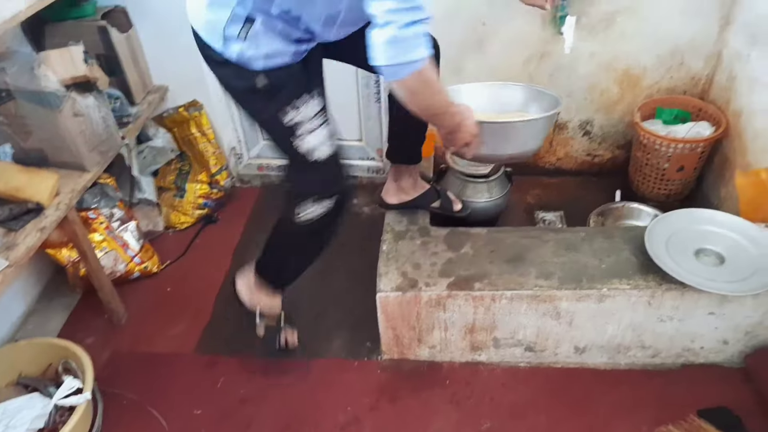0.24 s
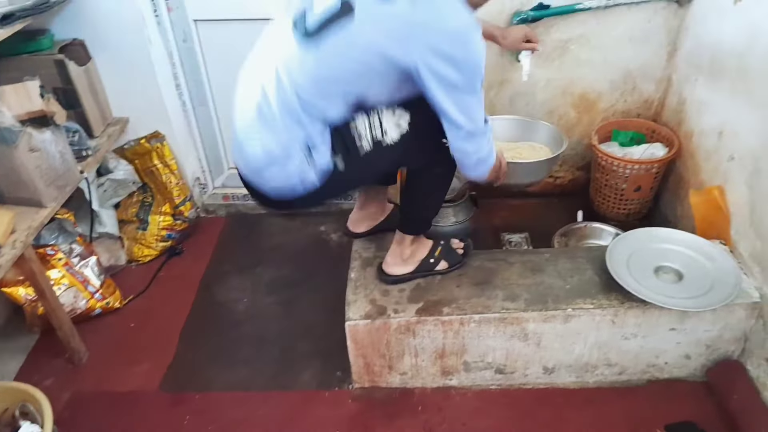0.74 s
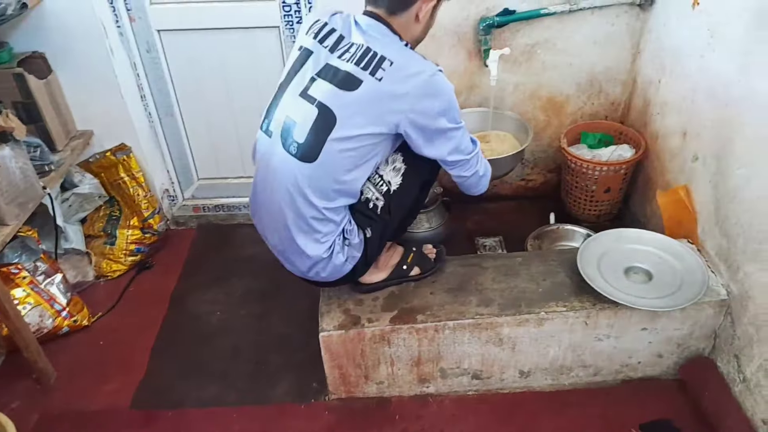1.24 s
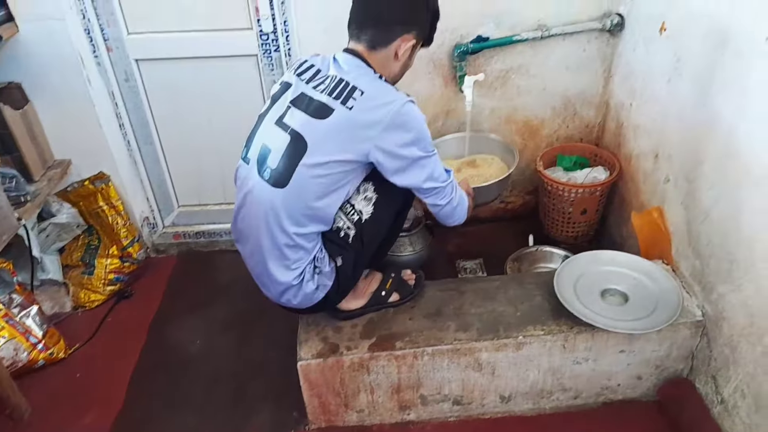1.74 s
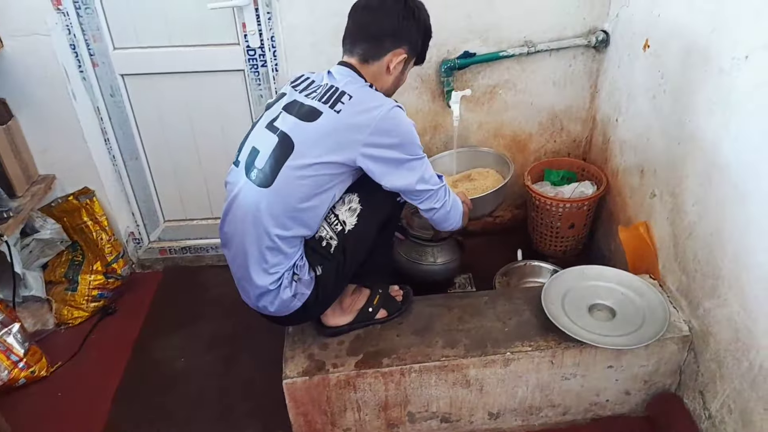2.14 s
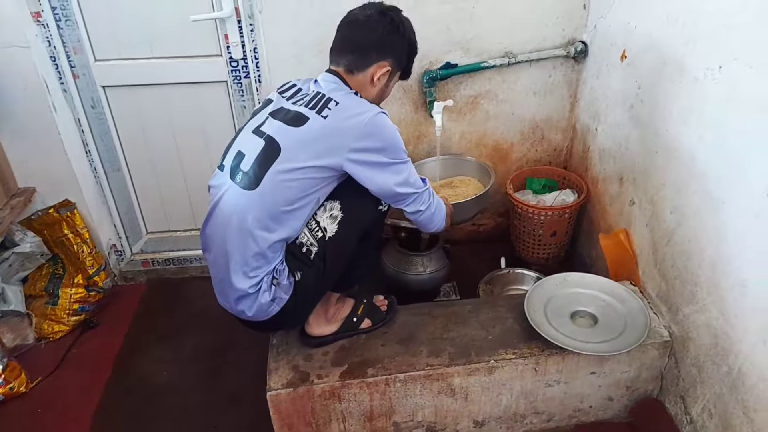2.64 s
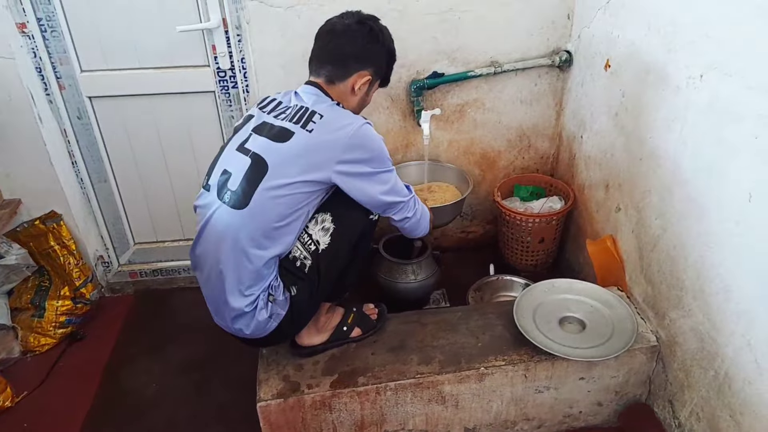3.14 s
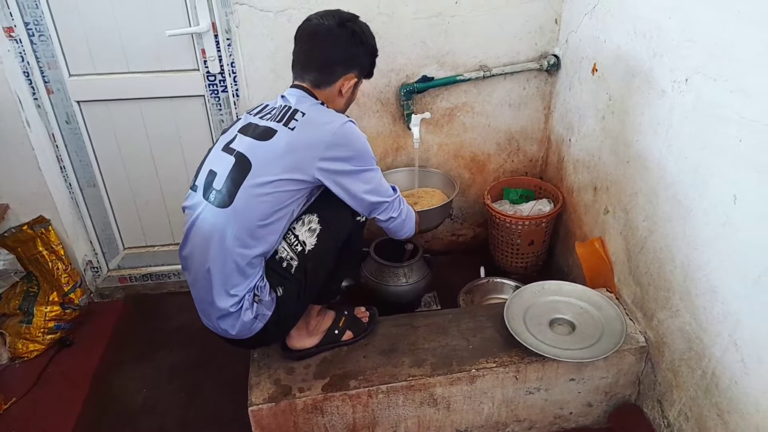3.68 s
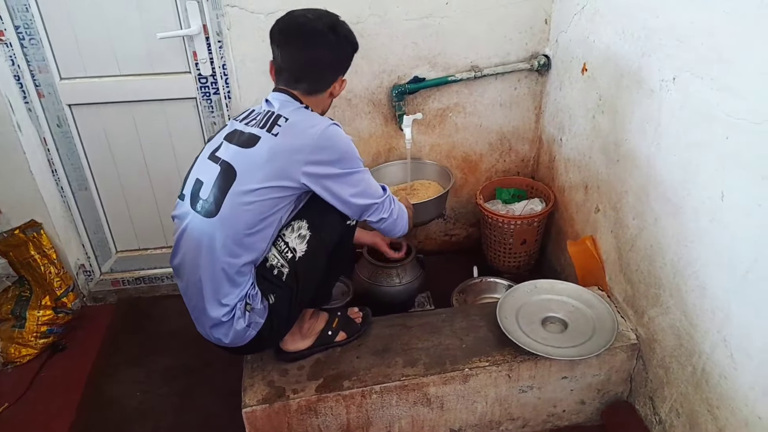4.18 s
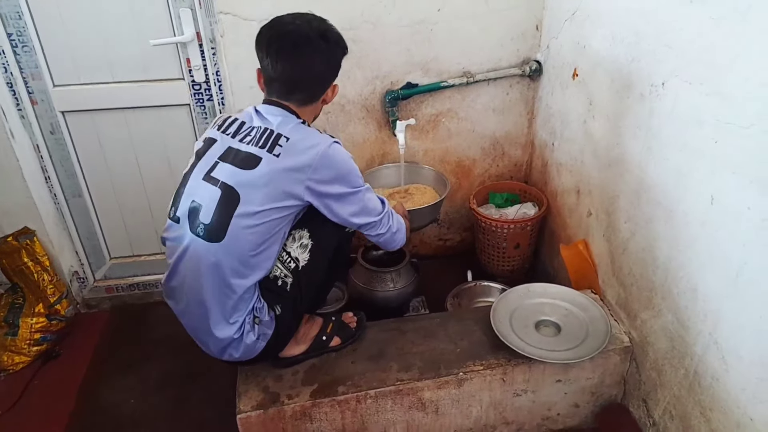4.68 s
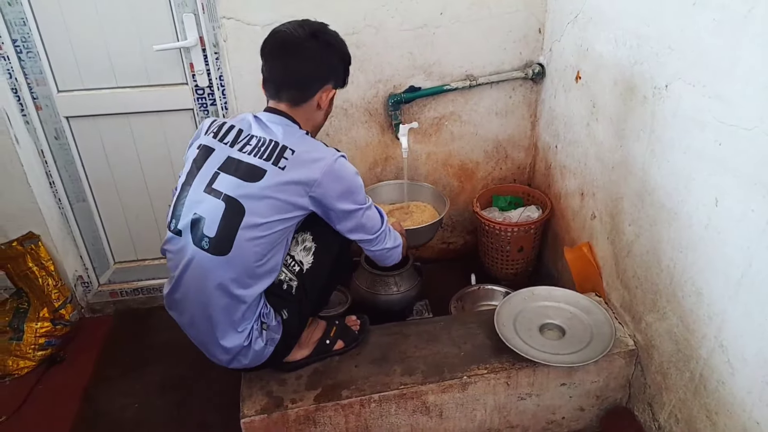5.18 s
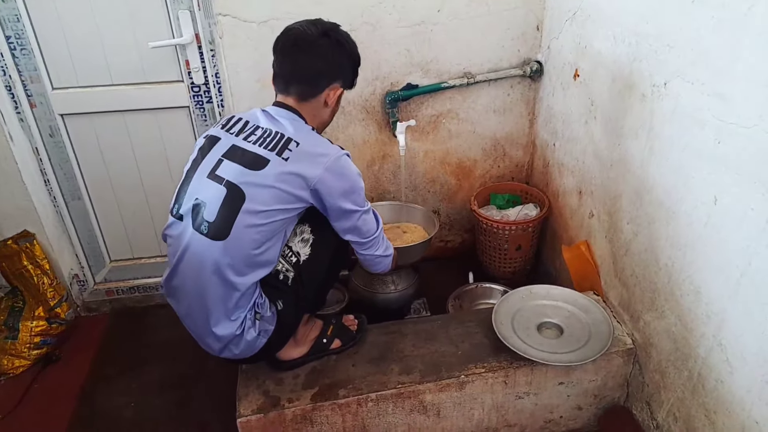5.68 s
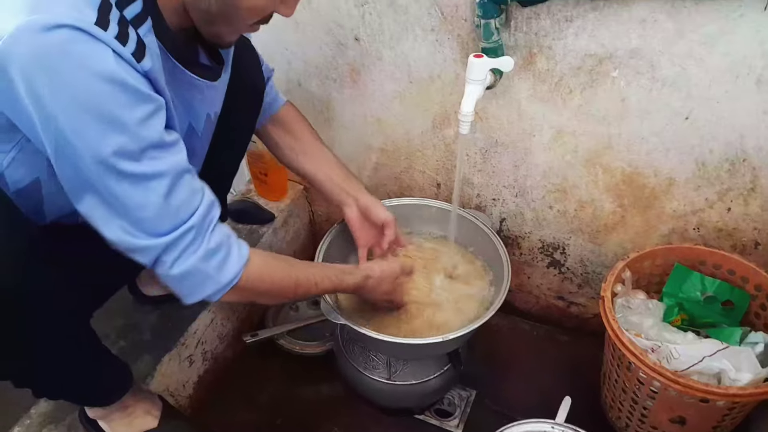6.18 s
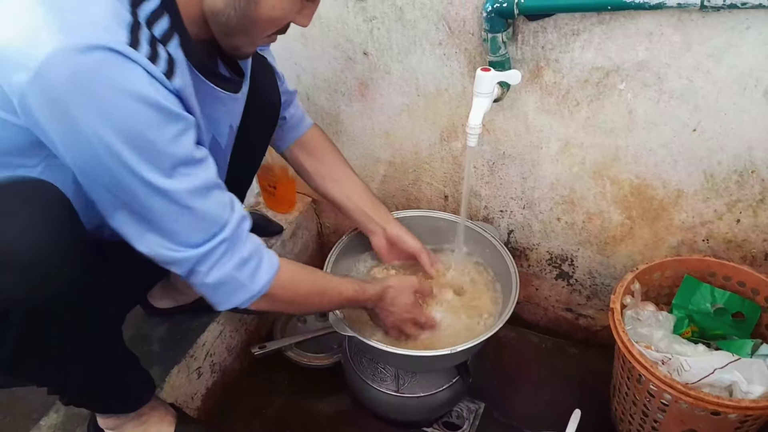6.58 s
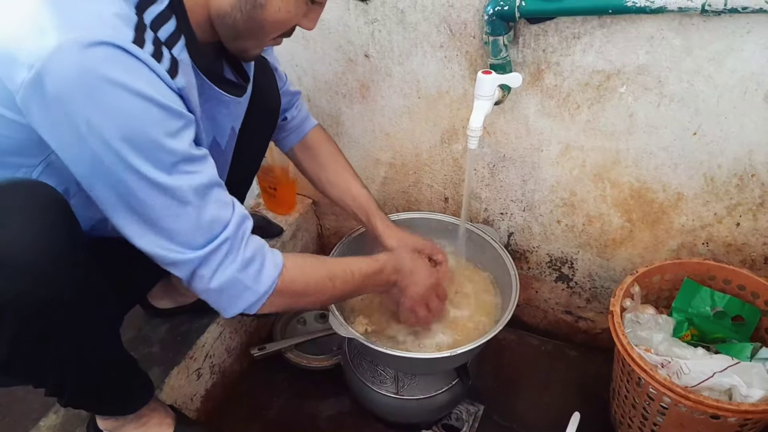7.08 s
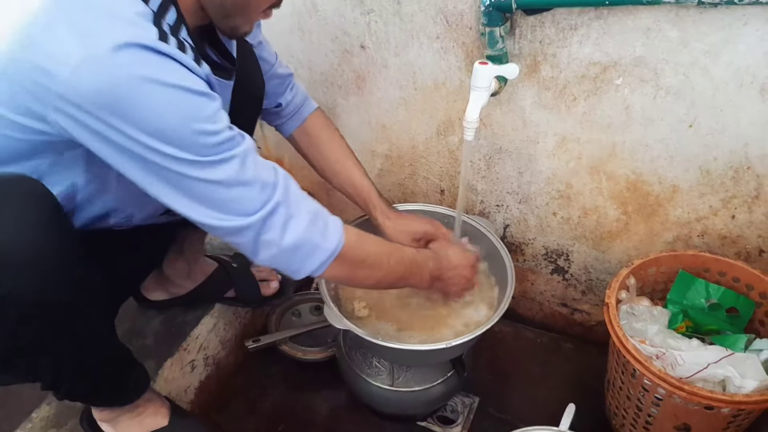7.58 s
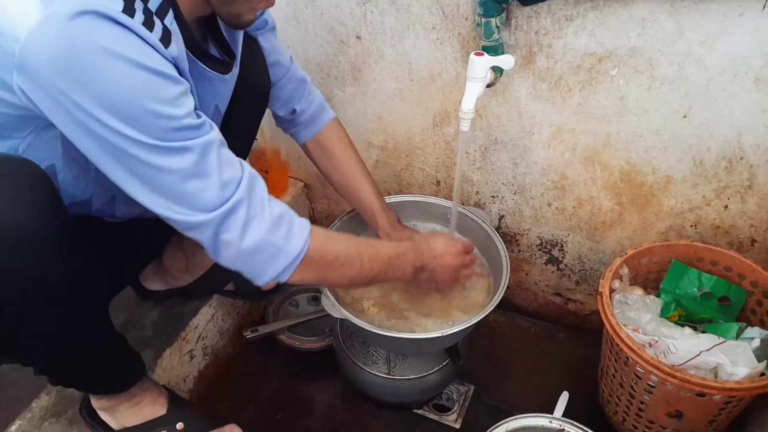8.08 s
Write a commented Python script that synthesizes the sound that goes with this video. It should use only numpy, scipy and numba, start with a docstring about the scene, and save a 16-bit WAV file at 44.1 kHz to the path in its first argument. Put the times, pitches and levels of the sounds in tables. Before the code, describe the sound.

A tap squeaks open and water patters into a metal basin of rice, a pot drags and clanks, then hands swish the wet grains.

```python
"""In a quiet room clothes rustle, a sandal scuffs and a heavy footfall booms; then a tap spits and whistles open.
Thin spray thickens into a jet on a metal basin of rice: swarms of tiny damped sines, the bubbles rising in pitch.
A pot is tugged over concrete (judder and groan), then knocks on the basin: two sets of ringing modes and clatter.
Last, hands swish the wet rice stroke by stroke: rubbing, sloshing and drumming grains, with single splashes.
Noise-burst echoes of hard walls close by surround most sources; most of the spectrum leans to the right."""
import sys
import numpy as np
from scipy import signal
from scipy.fft import rfft, irfft, next_fast_len
from scipy.io import wavfile
from scipy.ndimage import uniform_filter1d
from numba import njit

SR = 44100
rng = np.random.default_rng(int(sys.argv[2]) if len(sys.argv) > 2 else 0)


def digitize_waveform(pressure):
    """Quantize a signal to 16-bit integers and store it at the path in sys.argv[1].

    Rows of a 2-D input are taken as channels; values are limited to [-1, 1].
    """
    field = np.atleast_2d(pressure).T
    bounded = np.clip(field, -1, 1)
    quanta = np.round(bounded * 32767).astype(np.int16)
    wavfile.write(sys.argv[1], SR, quanta)


N = 367353
TIME = np.arange(N) / SR


def undb(db):
    """Decibels to gain."""
    return 10 ** (np.asarray(db) / 20)


def unit(x):
    """Scale to rms 1."""
    return x / np.sqrt(np.mean(x ** 2) + 1e-20)


def curve(rows, index=1):
    """One column of a table, joined by straight lines in time."""
    rows = np.array(rows)
    return np.interp(TIME, rows[:, 0], rows[:, index])


def swell(rows, index=1):
    """Gain from a dB column, faded to silence outside the table's times."""
    inside = (TIME >= rows[0][0]) & (TIME <= rows[-1][0] + .02)
    return undb(curve(rows, index)) * uniform_filter1d(inside * 1., size=500)


def gesture(s, length_s, attack_s, release_s):
    """Envelope of one movement: it builds, holds, and dies away."""
    build = np.clip((TIME - s) / attack_s, 0, 1)
    return build * np.exp(-np.clip((TIME - s - length_s) / release_s, 0, 20))


def gestures(rows, attack_s, release_s, index=2):
    """Gain of a run of movements (start, length, dB columns); the loudest one rules at each moment."""
    moves = [undb(row[index]) * gesture(row[0], row[1], attack_s, release_s) for row in rows]
    return np.max(moves, axis=0)


def colour(x, points):
    """Filter by a spectrum of (f/Hz, level/dB) points, falling steeply beyond its ends."""
    hz, db = np.transpose(points)
    size = next_fast_len(N, True)
    f = np.fft.rfftfreq(size, 1 / SR) + 1
    skirts = 1 / np.sqrt((1 + (hz[0] / f) ** 8) * (1 + (f / hz[-1]) ** 8))
    shape = skirts * undb(np.interp(np.log(f), np.log(hz), db))
    return irfft(rfft(x, size) * shape, size)[..., :N]


def band(x, lo_hz, hi_hz):
    """Causal band-pass."""
    edges = [lo_hz, min(hi_hz, SR / 2 - 100)]
    return signal.sosfilt(signal.butter(3, edges, "band", fs=SR, output="sos"), x)


def add(out, s, sound):
    """Mix a sound in at time s."""
    start = int(s * SR)
    out[:, start:start + sound.shape[-1]] += sound[..., :N - start]


def diffuse(size, alike_hz=550):
    """Noise from all sides: the two channels agree in the bass only."""
    mid, side = rng.standard_normal((2, size))
    side = signal.sosfilt(signal.butter(1, alike_hz, "high", fs=SR, output="sos"), side)
    return np.array([mid + side, mid - side]) / np.sqrt(2)


def room(x, wet_db, early_db=3, early_s=0.0069):
    """Direct sound, a cluster of echoes from the corner, and a short tail."""
    tail_t60_s = .36
    t = TIME[:SR // 2]
    early = diffuse(len(t)) * np.exp(-t / early_s)
    tail = diffuse(len(t)) * undb(-60 * t / tail_t60_s)
    response = (undb(early_db) * unit(early) + undb(wet_db) * unit(tail)) / np.sqrt(len(t))
    response[:, 0] += 1  # direct sound
    response /= np.sqrt(np.sum(response ** 2) / 2)
    return signal.fftconvolve(x[None], response, axes=1)[:, :len(x)]


@njit
def ring(start, hz, cycles, size, glide):
    """Sum of short damped sines; with glide, each rises in pitch as a bubble nears the surface."""
    out = np.zeros(N)
    for k in range(len(start)):
        life = cycles[k] * SR / hz[k]  # in samples
        turn = 2 * np.pi * hz[k] / SR
        z = size[k] + 0j
        step = np.exp(1j * turn - 5 / life)
        bend = np.exp(1j * turn * glide / life)
        for i in range(start[k], min(N, start[k] + int(life))):
            z, step = z * step, step * bend
            out[i] += z.imag
    return out


def grains(rate, lo_hz, hi_hz, cycles, spread_db, glide):
    """A swarm of damped sines, rate per second: many small ones and a few large."""
    when, pitch, length, size = rng.random((int(rate * N / SR), 4)).T
    hz = lo_hz * (hi_hz / lo_hz) ** pitch
    size = undb(-spread_db * np.log(size + .004)) * hz
    return unit(ring((when * N).astype(np.int64), hz, cycles * (.5 + length), size, float(glide)))


def swarm(rate, lo_hz, hi_hz, cycles, spread_db, glide, wet_db, count=4):
    """Grains born at several spots, each with its own echoes, so that the colour keeps shifting."""
    spots = [room(grains(rate / count, lo_hz, hi_hz, cycles, spread_db, glide), wet_db, early_s=0.014)
             for _ in range(count)]
    return unit(sum(spots))


def jet():
    """The jet patters on the rice and bubbles, darker the more of it lands in standing water."""
    # landing of the jet: t/s, level/dB (before the trims below), share landing in standing water (0-1)
    landing = [(1.15, -35.5, 0.07), (1.5, -32, 0.1), (2.05, -31, 0.16), (3.0, -38, 0.21), (4.3, -40, 0.36),
               (5.1, -39, 0.29), (5.7, -37, 0.22), (7.5, -40.5, 0.2)]
    # colour on bare rice, then in standing water: f/Hz, relative level/dB
    rice_colour = [(250, -47), (420, -10), (519, -24), (880, -4), (1740, -20.5), (2210, -14), (2690, -11.5),
                   (4360, -3), (9280, -13.5), (13100, -2), (15500, -9.5)]
    pool_colour = [(41, -6), (70, -2.5), (144, 10.5), (177, -6), (291, 8.5), (348, 2), (390, 3.5),
                   (1030, -14.5), (1550, -15), (2320, -1), (4280, -20), (15500, -32.5)]
    open_s, flow_rise_s, thicken_s = 0.914, 0.14, 0.29  # start, time to full flow, time to a solid jet

    patter = swarm(10000, 89, 14800, cycles=2.1, spread_db=0.5, glide=0, wet_db=8)
    bubbles = swarm(2600, 500, 8450, cycles=21, spread_db=1.0, glide=0.033, wet_db=10.5, count=2)
    water = patter + undb(3.0) * bubbles
    on_rice = colour(water, rice_colour)
    in_pool = colour(water, pool_colour)
    # match both colours by their treble
    on_rice = on_rice / np.std(band(on_rice, 2500, 15000))
    in_pool = in_pool / np.std(band(in_pool, 2500, 15000))
    pool = np.clip(curve(landing, index=2), 0, 1)
    full = (1 - pool) * undb(-2.5) * on_rice + pool * undb(-3.5) * in_pool
    # the first thin spray mostly hisses; the body comes as the jet thickens
    spray = colour(full, [(900, -18), (4000, 6.0), (16000, 9.5)])
    opening = np.clip((TIME - open_s) / flow_rise_s, 0, 1)
    thick = np.clip((TIME - open_s) / thicken_s, 0, 1)
    flutter_db = .9 * unit(band(rng.standard_normal(N), 3, 18))
    flow = opening * undb(curve(landing) + flutter_db)
    return flow * (thick * full + (1 - thick) * spray)


def swish():
    """Hands rub the grains, slop the water and drum on the basin floor; knocks toss the grains too."""
    # strokes of the hands: t/s, length/s, rubbing level/dB, sloshing level/dB, drumming level/dB
    strokes = [(5.783, .07, -30, -39.5, -33), (5.895, 0.086, -30.5, -38.5, -31),
               (6.02, 0.08, -29.5, -40, -31), (6.115, .17, -29.5, -42, -28.5), (6.335, 0.11, -31, -48, -32),
               (6.495, 0.065, -30, -37, -28), (6.6, .12, -28, -35, -30.5), (6.775, 0.13, -31.5, -42, -37),
               (6.905, 0.047, -27.5, -47, -33.5), (6.995, 0.083, -27.5, -36.5, -30.5),
               (7.06, .1, -29, -34.5, -29), (7.215, 0.15, -28, -40, -33.5), (7.6, 0.15, -33.5, -43.5, -51),
               (7.725, 0.083, -31, -42, -50.5), (7.87, 0.22, -32, -40.5, -52),
               (8.04, 0.15, -31.5, -40.5, -41.5), (8.25, 0.11, -30.5, -57, -56)]
    # hard knocks toss the wet rice: t/s, level/dB
    tosses = [(2.363, -16.5), (3.331, -24), (4.513, -23), (4.719, -27.5)]
    # colour of the rubbing grains, then of the drummed floor: f/Hz, relative level/dB
    rub_colour = [(880, -6.5), (1500, 3.5), (1790, -15.5), (1950, 2.5), (2440, -3), (2750, 3), (4390, 2),
                  (5290, 3.5), (7230, 1.5), (9330, -10), (12600, 0), (15500, -5.5)]
    drum_colour = [(45, -22), (80, -6.5), (115, 5), (168, -9.5), (215, 8), (260, -4.5), (300, 4),
                   (345, -12), (395, -2.5), (560, -10), (720, -9.5), (950, -9)]
    attack_s, releases_s = 0.011, (0.11, 0.055, 0.046)  # releases of rubbing, sloshing, drumming

    ticks = swarm(4500, 1050, 20300, cycles=6.6, spread_db=4.0, glide=0, wet_db=6.5)
    bubbles = swarm(1300, 1534, 9060, cycles=68, spread_db=4.5, glide=0.15, wet_db=9.5, count=2)
    rub = unit(colour(ticks + undb(-3.5) * bubbles, rub_colour))
    rub *= undb(1.1 * unit(band(rng.standard_normal(N), 12.4, 40)))  # clumps of rice catch and give way
    slosh = swarm(500, 630, 2040, cycles=6.6, spread_db=3, glide=0.052, wet_db=-13, count=2)
    slosh = unit(band(slosh, 553, 2900))
    drum = swarm(1400, 43, 970, cycles=3.7, spread_db=2.6, glide=0, wet_db=2, count=2)
    drum = unit(colour(drum, drum_colour))
    hands = 0
    for column, layer, release_s in zip((2, 3, 4), (rub, slosh, drum), releases_s):
        hands = hands + layer * gestures(strokes, attack_s, release_s, index=column)
    tossed = sum(undb(db) * gesture(s, length_s=.012, attack_s=.008, release_s=0.03) for s, db in tosses)
    return hands + rub * tossed


def splashes(cycles=14, rise_cycles=3, snap_db=-6):
    """A slap of water snaps and traps one bubble, whose ring swells before it decays; low ones are favoured."""
    # single splashes: t/s, strength/dB (before pitch weighting and final gain), bubble f/Hz
    slaps = [(6.135, -20, 2700), (6.225, -14, 4740), (6.612, -18.5, 2620), (6.864, -17, 5000),
             (7.013, -15, 2800), (7.376, -13, 5560), (7.555, -11, 5800), (7.916, -13, 5560),
             (8.047, -15.5, 1080), (8.058, -23, 1130), (8.154, -20, 2380), (8.266, -16.5, 3900)]
    s, db, hz = np.transpose(slaps)
    start, each = (s * SR).astype(np.int64), np.ones(len(s))
    size = undb(db - 1.0 * np.log2(hz / 3000))  # 1 dB more per octave down
    # a long ring minus a short one gives the soft onset
    pops = ring(start, hz.copy(), cycles * each, size, 0.099)
    pops = pops - ring(start, hz.copy(), rise_cycles * each, size, 0.)
    snaps = ring(start, 3700.0 * each, 4.1 * each, undb(db + snap_db), 0.)
    return undb(7.5) * room(pops + snaps, wet_db=7.5, early_db=9.5)


def metal(modes, t, spot_hz, boost_db, spot_width=0.087, detune=0.0013):
    """Ring of a vessel: the struck spot favours some modes; each has its own phase in the two channels."""
    out = 0
    for hz, db, t60 in modes:
        favour = boost_db * np.exp(-(np.log(hz / spot_hz) / spot_width) ** 2)
        phase = min(hz / 1600, 1.3) * rng.uniform(-1.82, 1) * np.array([[1], [-1]])
        pitch = hz * (1 + detune * rng.standard_normal())
        out = out + undb(db + favour - 60 * t / t60) * np.sin(2 * np.pi * pitch * t + phase)
    return out


def knocks(clatter_db=4, clatter_t60=0.61, attack_s=0.0037, crack_s=0.0026):
    """Each blow rings both vessels and clatters round the walls; the contact sets its colour."""
    # pot against basin: t/s, crack peak/dB, levels of thud/dB, body/dB, clang/dB, edge/dB,
    # basin over pot/dB, mode favoured by the spot f/Hz, its boost/dB, damping by the hands/(dB per s)
    blows = [(2.307, -10, -37, -21.5, -16.5, -26.5, 3, 1800, -1, 30),
             (2.364, -17, -20, -22.5, -17, -20.5, -1, 1830, 8, 51),
             (2.587, -45, -19.5, -18.5, -29.5, -41, 3, 714, 28, 26),
             (2.669, -5, -17.5, -13.5, -15, -24.5, -6, 1110, 0.5, 38),
             (3.082, 2, -27, -24, -12, -12, 9.5, 4030, 10, 70),
             (3.137, -13, -33.5, -24.5, -18.5, -29, -4, 3880, 14, 22),
             (3.177, -18, -34, -42, -24.5, -61, 3, 1770, 14, 22),
             (3.303, -46, -25, -20.5, -61, -42, -7, 1100, 31, 36),
             (3.334, -28, -31, -28.5, -28, -29, -8, 738, 15, 1),
             (3.594, -26, -27.5, -23, -19, -33, -5, 3080, 11, 47),
             (3.654, -16, -32, -25.5, -20, -32, -6, 2860, 10, 34),
             (3.708, -30, -33, -30, -28, -54, -8, 3000, 10, 41),
             (3.763, 3, -21.5, -12.5, -35, -33, -8.5, 4730, 11, 51),
             (3.806, -1.5, -35, -20, -57, -45, -12, 886, 11.5, 56),
             (3.861, -28, -43, -27, -34, -38.5, -13, 2900, 12, 2),
             (3.897, -5, -35, -25.5, -55, -58, -15, 990, 17, 21),
             (4.088, -30, -38.5, -24, -60, -64, -9, 1004, 13, 10),
             (4.129, -28, -37.5, -26, -46, -56, -29, 1100, 0.5, -17),
             (4.513, -16, -30.5, -14, -13, -49, 34, 1845, 4, 6),
             (4.721, -20, -32.5, -27, -24, -33.5, 23.5, 1850, 13, 15)]
    # edges of the thud, body, clang and edge bands: f/Hz
    edges_hz = [115, 500, 1400, 3400, 16000]
    # modes of the basin, then of the pot: f/Hz, relative level/dB, t60/s (before the hands' damping)
    basin_modes = [(294.1, -14, 0.41), (711, -3.5, 0.9), (964, -9, 0.13), (1120, -10, 0.13),
                   (1690, -15, 0.55), (1797, -2, 0.31), (2080, -40, 0.59), (3756, -18, 0.36),
                   (3800, -26, 0.33), (3954, -15.5, 0.076), (3860, -17, 0.33), (4810, -12, 0.17),
                   (5100, -16.5, 0.27), (6370, -15, 0.051), (6340, -12, 0.12)]
    pot_modes = [(302.5, -10.5, 0.29), (383.4, -1.5, 0.19), (571.6, -14.5, 0.52), (760, 0.5, 0.063),
                 (870.6, 1, 0.13), (924, 2, 0.092), (1035, -19, 0.91), (1091, -4.5, 0.53),
                 (1307, -7, 0.098), (1390, -17, 0.38), (1646, -9, 0.18), (1886, -13, 0.086),
                 (2340, -8, 0.1), (2670, -24, 0.1), (2810, -2.5, 0.33), (2833, -6.5, 0.31),
                 (2900, -4.5, 0.12), (3016, -13.5, 0.17), (4760, -13, 0.18), (4800, -8.5, 0.27),
                 (5100, -2.5, 0.084), (5370, -12, 0.16), (6170, -5, 0.13), (7350, -16, 0.23)]
    # colour of the dense clatter, strongest in the bass and falling towards the treble: f/Hz, relative level/dB
    clatter_colour = [(70, 12), (160, -22.5), (260, 6.5), (390, -0.5), (520, -2), (1050, 3.5),
                      (1450, -11.5), (1800, 2), (2500, -9.5), (3800, -12.5), (7000, -16.5), (9400, -32.5),
                      (13000, -36.5), (15500, -55)]

    out, t = np.zeros((2, N)), TIME[:int(.8 * SR)]
    dense = unit(colour(diffuse(N), clatter_colour))
    for s, crack_db, *levels, basin_db, spot_hz, boost_db, damping in blows:
        basin = undb(basin_db / 2) * metal(basin_modes, t, spot_hz, boost_db)
        pot = undb(-basin_db / 2) * metal(pot_modes, t, spot_hz, boost_db)
        rings = basin + pot
        rings = rings + undb(-3) * room(rings[0], wet_db=11.5, early_db=-0.5)  # echoes make the ring waver
        clatter = dense[:, int(s * SR):][:, :len(t)] * undb(clatter_db - 60 * t / clatter_t60)
        raw = (rings + clatter) * undb(-damping * t) * (1 - np.exp(-t / attack_s))
        blow = 0
        for lo_hz, hi_hz, db in zip(edges_hz, edges_hz[1:], levels):
            part = band(raw, lo_hz, hi_hz)
            onset = np.std(part[:, :SR // 20], axis=1, keepdims=True)  # level of the first 50 ms
            blow = blow + part * undb(db) / onset
        # the instant of contact stands out above the ring
        crack = blow * np.exp(-(t / crack_s) ** 2)
        add(out, s, blow + crack * undb(crack_db) / np.abs(crack).max())
    return out


def drag(groan_db=-6, groan_width_hz=22):
    """The pot judders over rough concrete in short tugs; its hollow body groans."""
    # tugs on the pot: t/s, length/s, level/dB, strongest resonance f/Hz
    tugs = [(1.562, .05, -43.5, 171), (1.783, 0.078, -31.5, 218), (2, 0.047, -31, 180),
            (2.149, 0.034, -32, 178), (2.214, 0.077, -28.5, 295), (2.304, 0.14, -19.5, 208),
            (2.578, 0.073, -22, 289.7)]
    # colour of the judder: f/Hz, relative level/dB
    judder_colour = [(42, -41), (72, -11), (107, -11), (139, -1), (374, -2.5), (514, -21), (558, -12.5),
                     (651, -15.5), (894, -13.5), (1200, -30), (1560, -53), (2640, -120)]
    attack_s, release_s, slide_db = 0.016, 0.05, -36.5  # the slide goes on between the tugs

    judder = unit(colour(room(grains(1400, 64, 1180, 5.2, 2.5, 0), wet_db=-0.5), judder_colour))
    grip = unit(band(rng.standard_normal(N), 2.0, groan_width_hz))
    pitch = curve([(s + length / 2, hz) for s, length, _, hz in tugs])
    tone = np.sin(2 * np.pi * np.cumsum(pitch) / SR)
    groan = unit(room(grip * tone, wet_db=1, early_db=-26))
    first_s, last_s = tugs[1][0], tugs[-1][0]  # the slide begins with the second tug
    slide = undb(slide_db) * gesture(first_s, last_s - first_s, attack_s, release_s)
    force = np.maximum(gestures(tugs, attack_s, release_s), slide)
    return force * (judder + undb(groan_db) * groan)


def valve():
    """Water squeezes through the opening tap with a hiss and a wavering whistle."""
    # the valve spits as it opens: t/s, level/dB (before a 2 dB cut)
    spit = [(0.64, -64), (0.698, -36), (0.778, -37), (0.786, -40.5), (0.82, -31), (0.914, -52), (0.92, -46)]
    # colour of the spit: f/Hz, relative level/dB
    spit_colour = [(590, -64), (1000, -29), (1390, -19), (1550, -22), (2360, -2), (2590, -11.5),
                   (4050, -21), (4240, -15.5), (5920, -12.5), (7790, -9.5), (9800, -20), (12900, -12),
                   (15500, -17)]
    # whistle while the gap is narrow: t/s, f/Hz, level/dB
    narrow_gap = [(.735, 7050, -53), (.752, 7550, -27.5), (.77, 7880, -31), (.79, 7860, -29),
                  (.82, 8350, -30), (.845, 8160, -68)]

    hiss = unit(colour(diffuse(N), spit_colour)) * swell(spit) * undb(-2.0)
    waver = 1 + 0.028 * unit(band(rng.standard_normal(N), 30, 400))
    phase = 2 * np.pi * np.cumsum(curve(narrow_gap) * waver) / SR
    whistle = np.sin(phase) * swell(narrow_gap, index=2)
    return hiss + room(whistle, wet_db=-12, early_db=8)


def footsteps():
    """Clothes rustle, a sole scuffs, and the heavy step booms as damped low modes."""
    # sleeve and trousers rustle: t/s, level/dB; then colour: f/Hz, relative level/dB
    rustle = [(.05, -73), (.17, -62), (.225, -49.5), (.28, -64.5), (.36, -80)]
    rustle_colour = [(88, -59), (150, -24), (386, -9), (601, -17), (1350, -20), (1460, -17), (1570, -15.5),
                     (9270, -29.5), (15000, -37)]
    # a sandal scuffs onto the step: t/s, level/dB; then colour: f/Hz, relative level/dB
    scuff = [(.552, -69), (.56, -38.5), (.62, -41.5), (.69, -40), (.8, -53), (.95, -54), (1.1, -66)]
    scuff_colour = [(71, -31.5), (120, -3.5), (166, -16), (286, -8), (323, -6), (546, -22.5), (2200, -21),
                    (3720, -25.5), (4460, -26.5), (15000, -47)]
    # modes of the step: f/Hz, level/dB (before the soft onset), t60/s
    step_modes = [(44, -25, 0.92), (52, -36, 0.46), (76, -18.5, 0.82), (112, -50, 0.36)]

    scrape = room(grains(5000, 93, 15000, 3.0, 4.2, 0), wet_db=0.5)
    out = unit(colour(scrape, scuff_colour)) * swell(scuff)
    out += unit(colour(diffuse(N), rustle_colour)) * swell(rustle)
    t = TIME[:SR]
    boom = sum(undb(db - 60 * t / t60) * np.sin(2 * np.pi * hz * t) for hz, db, t60 in step_modes)
    add(out, .575, boom * (1 - np.exp(-t / 0.096)))
    return out


def room_tone():
    """The quiet room: steady wide noise, heaviest in the bass."""
    # colour of the room: f/Hz, relative level/dB
    tone_colour = [(18, -36), (30, 8), (143, 2.5), (216, -3), (253, 2), (384, 2), (524, -5), (1690, -17),
                   (5170, -12), (7630, -23), (15000, -28)]
    return unit(colour(diffuse(N), tone_colour)) * undb(-63.5)


def scene():
    """All sources; most of the spectrum leans right, the deep bass and the 8 kHz region left."""
    # stereo balance: f/Hz, left minus right level/dB
    balance = [(60, 2.5), (110, -3), (200, -1.5), (380, -2.5), (700, -0.5), (1290, -1), (2380, -5),
               (4400, -4), (8120, 2), (15000, -14)]
    water = jet() + swish() + splashes()
    left, right = water + knocks() + drag() + valve() + footsteps() + room_tone()
    hz, lean_db = np.transpose(balance)
    lean = undb(np.interp(np.fft.rfftfreq(N, 1 / SR), hz, lean_db) / 2)
    return np.array([irfft(rfft(left) * lean, N), irfft(rfft(right) / lean, N)])


def record(dry):
    """Peaks beyond full scale clip hard; a steep low-pass then cuts the top."""
    top_hz = 15900
    return signal.sosfilt(signal.ellip(10, .2, 70, top_hz, fs=SR, output="sos"), np.clip(dry, -1, 1))


dry = scene()
out = record(dry)
digitize_waveform(out)
```